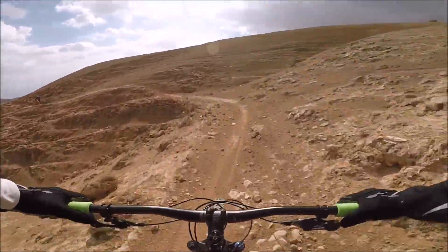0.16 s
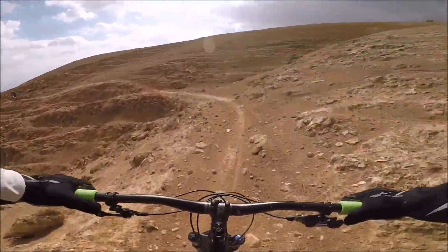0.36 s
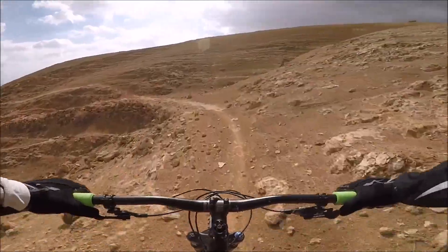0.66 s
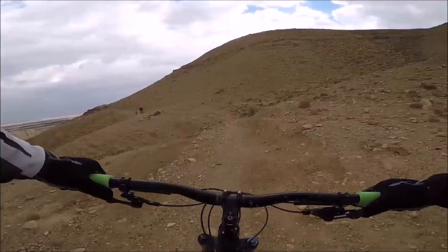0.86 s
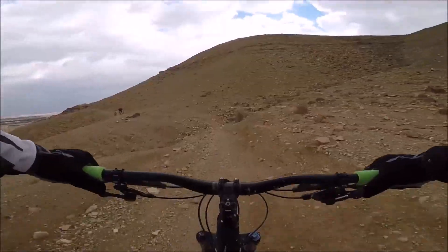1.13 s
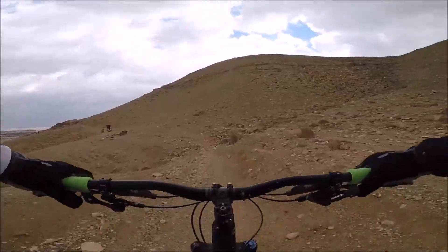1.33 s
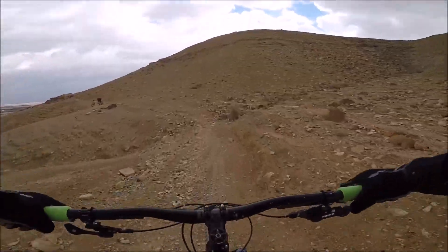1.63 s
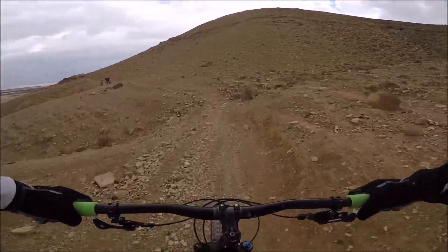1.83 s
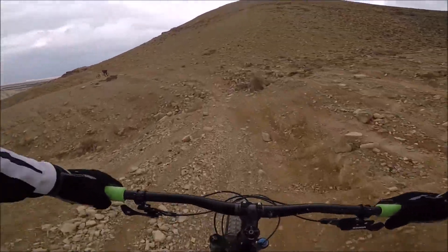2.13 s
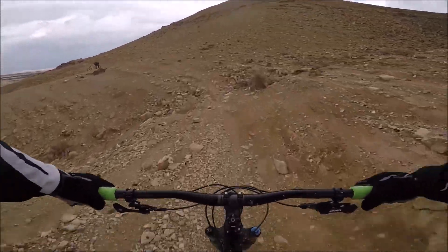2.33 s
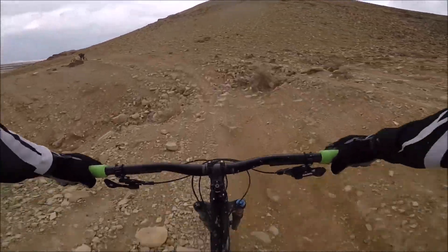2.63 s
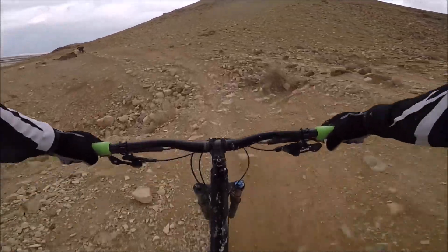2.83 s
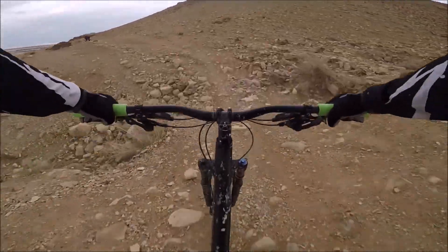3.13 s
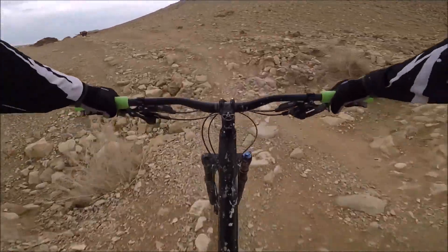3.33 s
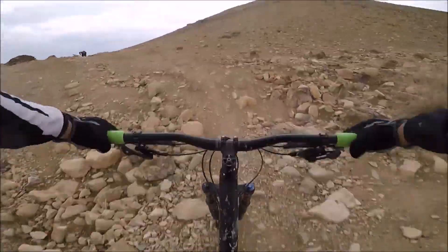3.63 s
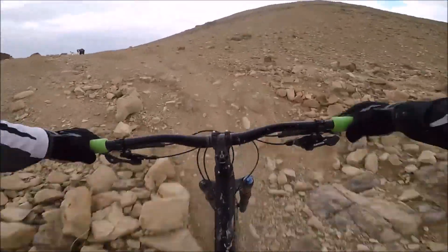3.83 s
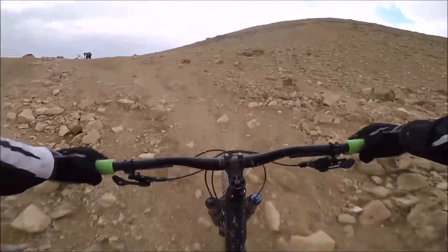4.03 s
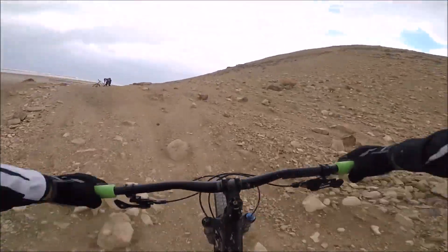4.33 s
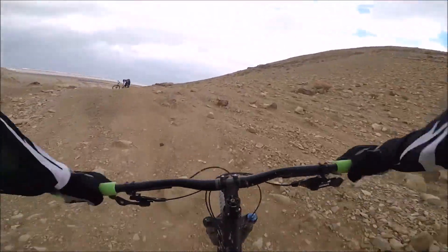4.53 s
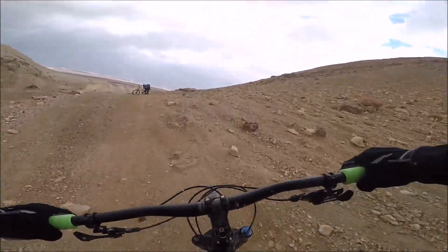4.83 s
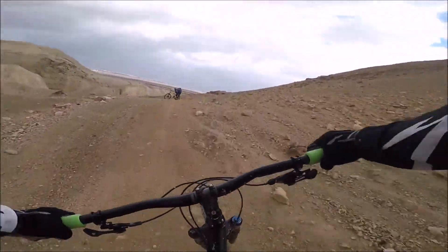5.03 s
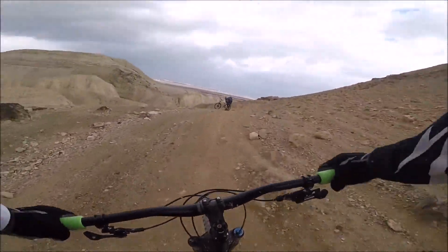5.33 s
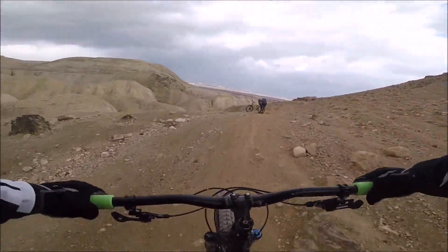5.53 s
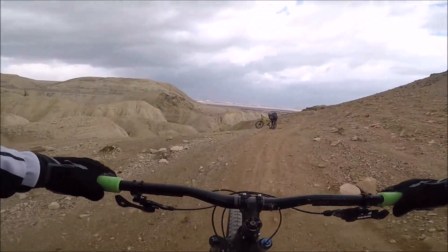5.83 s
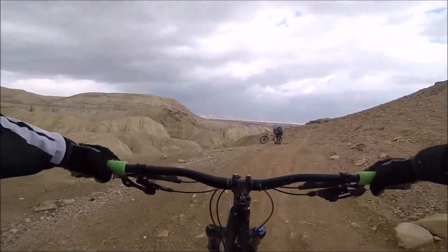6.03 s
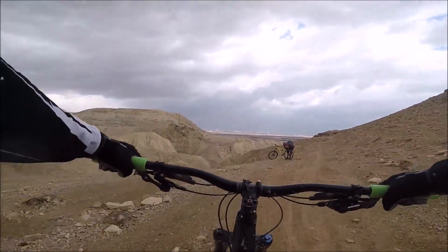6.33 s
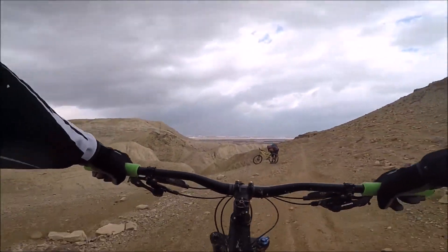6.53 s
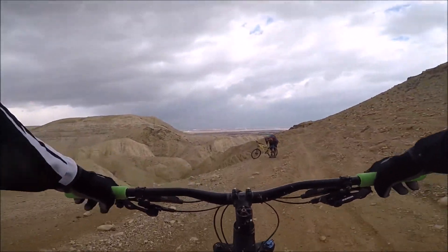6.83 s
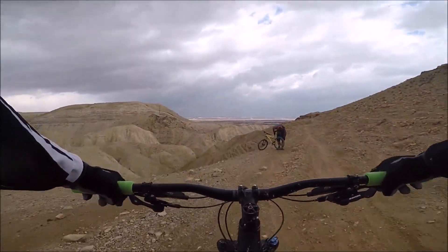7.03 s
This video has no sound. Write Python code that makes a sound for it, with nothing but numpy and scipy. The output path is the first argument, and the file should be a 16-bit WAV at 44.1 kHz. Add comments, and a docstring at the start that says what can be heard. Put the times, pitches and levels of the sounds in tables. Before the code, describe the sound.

Gritty tyre crunch and hollow frame knocks build over loose stones under rumbling wind, then ease into smooth coasting with distinct freewheel clicks.

```python
"""A rocky dirt trail, taken from a mountain bike by a small camera microphone on the rider's chest. Tyres
crunch grit and thud over rocks, with a hollow rub near 1.3 kHz swelling on the rough stretch: grains and noise
ring the frame's modes, as do knocking stones and cables. Scrapes are resonant noise. The freewheel purrs, then
ticks singly, its pawls driving small resonances. Coloured noise makes the wind at the microphone port; faint
treble noise comes and goes high up and flares with sharp jolts of the bike."""
import sys
import numpy as np
from scipy import signal
from scipy.fft import rfft, irfft, next_fast_len
from scipy.io import wavfile
from scipy.ndimage import uniform_filter1d, map_coordinates

SR = 44100
rng = np.random.default_rng(int(sys.argv[2]) if len(sys.argv) > 2 else 0)


def bounce(signal):
    """Save signal as a 16-bit WAV file at the path given by the first command-line argument."""
    frames = np.transpose(np.atleast_2d(signal))
    limited = np.clip(frames, -1, 1)
    pcm = np.round(limited * 32767).astype(np.int16)
    wavfile.write(sys.argv[1], SR, pcm)


N = 316135  # length in samples


def amp(db):
    """Decibels to linear gain."""
    return 10 ** (np.asarray(db) / 20)


def unit(x):
    """x scaled to an rms of 1."""
    return x / np.sqrt(np.mean(x ** 2) + 1e-20)


def curves(rows):
    """One value per sample for each column after the time, in straight lines between rows."""
    s, *columns = np.transpose(rows)
    return [np.interp(np.arange(N) / SR, s, column) for column in columns]


def wobble(rate):
    """A smooth random curve with rate knots a second."""
    knots = rng.standard_normal(int(N * rate / SR) + 4)
    return map_coordinates(knots, [np.arange(N) * rate / SR])


def filtered(x, response):
    """x passed through a complex response of frequency."""
    size = next_fast_len(x.shape[-1] + 8192)
    spectrum = rfft(x, size) * response(np.fft.rfftfreq(size, 1 / SR))
    return irfft(spectrum, size)[..., :x.shape[-1]]


def noise(spectrum, rate, lumpy_db):
    """Coloured noise of rms 1 whose level wanders in lumps."""
    f, db = np.transpose(spectrum)

    def colour(hz):
        return amp(np.interp(np.log(hz + 1), np.log(f + 1), db, left=-120, right=-120))

    lumps = amp(lumpy_db * wobble(rate))
    return unit(lumps * filtered(rng.standard_normal(N), colour))


def ringing(x, modes):
    """x drives a set of resonances side by side, alternating in sign."""
    def response(f):
        return sum((-1) ** k * amp(db) * 1j * f * width / (hz * hz - f * f + 1j * f * width)
                   for k, (hz, width, db) in enumerate(modes))

    return filtered(x, response)


def burst(pulses, t60):
    """Each pulse is a sharp push with a short puff of noise that falls 60 dB in t60 seconds."""
    t = np.arange(SR // 20) / SR
    puffs = signal.fftconvolve(pulses, amp(-60 * t / t60))[:N]
    return 6 * pulses + puffs * rng.standard_normal(N)


def grains(count, centre_hz, spread, cycles, spread_db):
    """Stones snap at random moments, each a damped sine of its own pitch and size.

    A positive spread_db lets a few stand out; a negative one makes a few faint."""
    at, size, phase = rng.random((count, 3)).T[:, :, None]
    hz = centre_hz * np.exp(spread * rng.standard_normal((count, 1)))
    k = np.arange(400)
    turns = hz * k / SR
    level = amp(-spread_db * np.log(1 - .99 * size))
    snaps = level * turns * np.exp(-3 * turns / cycles) * np.sin(2 * np.pi * (turns + phase))
    places = (at * N).astype(int) + k
    return unit(np.bincount(places.ravel(), snaps.ravel(), N + len(k))[:N])


def blows(events, bodies, rise, t60, push, size=N):
    """Each blow is a short rattle around one sharp push; it rings every body to its row's peak level."""
    out = np.zeros(size + SR // 12)
    t = np.arange(SR // 12) / SR
    for s, *parts_db in events:
        envelope = (1 - np.exp(-(t / rise) ** 2)) * amp(-60 * t / t60)
        rattle = envelope * rng.standard_normal(len(t))
        rattle[round(rise * SR)] += push
        start = round(s * SR)
        for gain, modes in zip(amp(parts_db), bodies):
            wider = [(hz, 2 * width, db) for hz, width, db in modes]
            part = ringing(ringing(rattle, modes), wider)
            out[start:start + len(t)] += gain * part / np.abs(part).max()
    return out[:size]


# Roughness of the ground under the tyres, before clumps: time_s, rub_db, crunch_db, grit_db
GROUND = [(0.0, -53, -58, -67), (0.96, -53.5, -56, -62.5), (1.24, -49, -53.5, -56),
          (1.64, -51.5, -52.5, -62), (2.14, -45, -48, -60), (2.85, -44, -50.5, -57.5),
          (3.17, -47, -56.5, -70), (3.39, -54, -49.5, -66), (3.71, -47, -48.5, -62),
          (3.89, -40, -47.5, -59.5), (4.03, -46, -49.5, -56.5), (4.31, -51, -52, -60.5),
          (4.81, -50.5, -52.5, -57.5), (5.09, -53, -53.5, -64.5), (5.39, -52, -54, -57),
          (5.61, -59.5, -57.5, -64.5), (6.59, -58, -59.5, -63), (7.17, -57, -61, -65)]
# The frame's low, middle and high sets of modes: pitch_hz, width_hz, gain_db
FRAME_MODES = [
    [(1078, 1010, 0.5), (1330, 276, 6.5), (1696, 275, -3)],
    [(2150, 670, -5), (2598, 136, 6.5), (2800, 810, -2), (3755, 750, -3)],
    [(3915, 250, 4.5), (5000, 380, -2.5), (5585, 330, 3.5), (7540, 5700, -7)],
]


def tyres():
    """Grit under the knobs shakes the frame's modes; rough ground comes in clumps."""
    clumps = 0.79 * wobble(7) + 1.15 * wobble(18)
    sand = amp(2.66 * wobble(150)) * rng.standard_normal((3, N))
    stones = grains(count=4000, centre_hz=1259, spread=0.45, cycles=2.5, spread_db=1.5)
    gravel = grains(count=5000, centre_hz=2810, spread=0.48, cycles=3.0, spread_db=5.5)
    grit = grains(count=6000, centre_hz=4600, spread=0.4, cycles=6.7, spread_db=-3.5)
    rub = unit(ringing(stones + 2.1 * sand[0], FRAME_MODES[0]))
    crunch = unit(ringing(gravel + .5 * stones + 2.44 * sand[1], FRAME_MODES[1]))
    fine = unit(ringing(grit + .5 * gravel + 1.17 * sand[2], FRAME_MODES[2]))
    rub_db, crunch_db, grit_db = curves(GROUND)
    return (amp(rub_db + 0.41 * clumps) * rub
            + amp(crunch_db + 1.5 * clumps) * crunch
            + amp(grit_db + 0.65 * clumps) * fine)


# A tyre rides over a rock: start_s, deep_thud_db, light_thud_db (peaks)
ROCKS = [(0.885, -34, -34), (0.981, -58, -34.5), (1.084, -59, -36), (1.322, -44, -30), (1.461, -35, -37),
         (1.523, -51, -35), (1.821, -26, -29), (1.962, -24, -43), (2.022, -29, -46), (2.382, -29, -32),
         (2.442, -26, -36), (3.145, -29, -37), (3.186, -24, -34), (3.216, -28, -42), (3.261, -31, -42),
         (3.298, -24, -31), (3.315, -25, -30), (3.349, -24, -33), (3.398, -24, -33), (3.428, -31, -34),
         (3.472, -29, -35), (3.544, -33, -38), (3.575, -29, -33), (3.683, -26, -28), (3.853, -21, -37),
         (3.888, -32, -38), (4.103, -27, -36), (4.44, -38, -40), (4.452, -50, -40), (4.467, -38, -41),
         (4.636, -29, -35), (4.655, -40, -44), (4.991, -37, -34), (5.327, -29, -36), (5.839, -30, -40),
         (5.935, -28, -44), (6.253, -28.5, -56), (6.345, -30, -46), (6.746, -26.5, -42)]
# The tyre's deep and light sets of modes: pitch_hz, width_hz, gain_db
TYRE_MODES = [
    [(257, 150, 0)],
    [(513, 760, 0), (844, 500, 4.5)],
]


def bumps():
    """Rocks strike the tyre and ring its deep and light modes."""
    return blows(ROCKS, TYRE_MODES, rise=0.002, t60=0.035, push=10)


# Stones and cables hit the frame: start_s, low_pitch_hz, low_db, middle_pitch_hz, middle_db, high_db (peaks)
FRAME_HITS = [(0.553, 1660, -57, 3350, -38, -45), (0.587, 1220, -42, 3260, -35, -33),
              (0.597, 1080, -48, 3220, -46, -39), (0.605, 1170, -46, 3000, -47, -35),
              (0.635, 865, -37, 3360, -43, -45), (0.654, 1090, -55, 3230, -46, -45),
              (0.675, 980, -57, 3170, -41, -40), (0.887, 1290, -36.5, 2780, -39, -41),
              (0.983, 1000, -41, 2300, -34, -47), (1.085, 1260, -40, 3260, -30, -51),
              (1.145, 1800, -25, 2280, -28, -30.5), (1.322, 1070, -35, 3220, -28.5, -35),
              (1.392, 1400, -36, 2390, -27.5, -28.5), (1.408, 1380, -35, 2500, -42, -51),
              (1.468, 1280, -55, 3600, -37, -46), (1.524, 1090, -39, 2400, -29, -34),
              (1.543, 1450, -44, 2630, -25.5, -38), (1.562, 1080, -32.5, 3460, -31, -40),
              (1.606, 1180, -52, 2740, -42, -44), (1.66, 1120, -38, 2260, -43, -49),
              (1.712, 1220, -34.5, 2800, -40, -54), (1.822, 1080, -24.5, 3150, -29.5, -42),
              (1.834, 1300, -45, 3000, -26.5, -42), (1.902, 1010, -32, 2410, -29, -38),
              (1.948, 1290, -31, 2370, -28, -52), (2.085, 1610, -56, 2450, -38, -57),
              (2.117, 1400, -22.5, 1830, -26, -51), (2.158, 1310, -39, 2660, -41, -53),
              (2.234, 1590, -56, 2150, -31, -63), (2.26, 1340, -26, 2440, -27, -42),
              (2.325, 1380, -44, 2610, -35, -58), (2.386, 1490, -27, 2520, -19.5, -54),
              (2.4, 1110, -41, 2450, -30, -52), (2.477, 1360, -35, 2240, -45, -52),
              (2.541, 1330, -31, 2360, -46, -51), (2.638, 1030, -36, 2880, -30, -49),
              (2.655, 1300, -24, 2050, -31, -49), (2.72, 1020, -41, 2540, -25.5, -46),
              (2.771, 1170, -28.5, 2580, -35, -36), (2.842, 1230, -30, 2400, -39, -49),
              (2.866, 1260, -17.5, 2100, -24.5, -59), (2.927, 1210, -25, 2350, -39, -41),
              (2.981, 1500, -27.5, 2680, -38, -47), (3.027, 1450, -44, 2950, -33, -58),
              (3.138, 1080, -32, 2520, -25.5, -57), (3.271, 1130, -37, 2900, -47, -70),
              (3.364, 1180, -35, 2660, -53, -56), (3.511, 1090, -33.5, 2700, -26, -47),
              (3.547, 1820, -29, 2060, -33.5, -57), (3.585, 1040, -41, 2230, -40, -52),
              (3.673, 1110, -36, 2730, -30, -53), (3.681, 1080, -27.5, 2280, -30, -44),
              (3.72, 1010, -33, 2300, -43, -57), (3.87, 1260, -37, 2190, -33, -39.5),
              (3.88, 1200, -47, 2220, -27.5, -44), (3.918, 1190, -25.5, 2510, -24.5, -47),
              (3.938, 1030, -49, 3400, -26, -38), (4.101, 1320, -29, 2960, -43, -34.5),
              (4.131, 1660, -45, 2400, -32, -31), (4.192, 1160, -43, 3290, -33, -49),
              (4.213, 1330, -31, 2340, -20, -27), (4.317, 1430, -33.5, 2350, -32, -65),
              (4.391, 1570, -50, 2730, -30.5, -43), (4.507, 1300, -34, 2280, -39, -57),
              (4.517, 1260, -33, 2440, -34, -45), (4.54, 1480, -31.5, 2520, -29, -31),
              (4.622, 1190, -41, 2730, -37, -48), (4.638, 1060, -48, 2640, -26.5, -37),
              (4.771, 1340, -32.5, 2500, -45, -54), (4.782, 1330, -31, 2330, -29.5, -51),
              (4.819, 1360, -39, 2850, -35, -57), (4.84, 1210, -36, 2740, -32.5, -55),
              (4.853, 1220, -34, 2760, -42, -53), (4.892, 1150, -40, 2850, -35, -52),
              (4.967, 1320, -37.5, 3290, -30.5, -46), (4.991, 1800, -34, 2380, -31, -34),
              (5.078, 1420, -29, 2100, -34, -53), (5.124, 930, -63, 2740, -38, -55),
              (5.285, 1250, -41, 2950, -37, -48), (5.439, 1160, -45, 3420, -34, -34.5),
              (5.478, 1120, -42, 2930, -36, -46), (5.534, 1360, -54, 3190, -39, -51),
              (5.553, 1240, -25.5, 2600, -26.5, -55), (5.828, 1300, -55, 3340, -33, -55),
              (5.916, 1360, -47, 3330, -30.5, -51), (6.422, 1120, -39, 2390, -64, -59),
              (6.928, 1270, -42, 2950, -47, -50)]
SPOT_WIDTH = .42  # width over pitch of the band that a struck spot favours


def near_spot(modes, spot_hz):
    """Modes far from the struck spot's pitch are weakened, and the spot adds a broad one of its own."""
    favoured = [(hz, width, db - 20 * np.log10(1 + (np.log(hz / spot_hz) / SPOT_WIDTH) ** 2))
                for hz, width, db in modes]
    return favoured + [(spot_hz, SPOT_WIDTH * spot_hz, 6)]


def knocks(events, rise, t60, push):
    """Each knock rings the frame's modes, low and middle ones most near the spot's pitches."""
    out = np.zeros(N)
    for s, low_hz, low_db, middle_hz, middle_db, high_db in events:
        highs = [(hz, width, db + rng.normal(0, 1.5)) for hz, width, db in FRAME_MODES[2]]
        bodies = [near_spot(FRAME_MODES[0], low_hz), near_spot(FRAME_MODES[1], middle_hz), highs]
        row = (0.0006, low_db, middle_db, high_db)
        blow = blows([row], bodies, rise, t60, push, size=SR // 12)
        start = round(s * SR)
        out[start:start + len(blow)] += blow[:N - start]
    return out


RATTLES_PER_S, RATTLE_OVER_DB, RATTLE_SCATTER_DB = 30, 2, 2  # rate, least peak over ground level, spread


def rattles():
    """Small stones flick the frame at random in close pairs, harder where the ground is rough."""
    draws = rng.random((round(RATTLES_PER_S * N / SR), 7))
    pair = np.arange(len(draws)) // 2 * 2  # both of a pair share one moment
    at = np.clip(draws[pair, 0] * N / SR + .04 * draws[:, 1], 0, (N - 1) / SR)
    ground_db = np.transpose(curves(GROUND))[(at * SR).astype(int)]
    scatter_db = -RATTLE_SCATTER_DB * np.log(1 - .95 * draws[:, 2:5])
    low_db, middle_db, high_db = (ground_db + RATTLE_OVER_DB + scatter_db).T
    low_hz = 1000 * np.exp(0.75 * draws[:, 5])
    middle_hz = 2100 * np.exp(.5 * draws[:, 6])
    rows = np.column_stack([at, low_hz, low_db, middle_hz, middle_db, high_db])
    return knocks(rows, rise=0.0028, t60=0.057, push=3.3)


# Short scrapes, rubs and scuffs: start_s, length_s, centre_hz, width_hz, level_db
SCRAPE_EVENTS = [(0.175, 0.084, 2850, 3400, -48), (0.536, 0.23, 3460, 900, -52.5),
                 (1.89, 0.073, 1140, 403, -39), (2.031, 0.051, 1320, 300, -45),
                 (2.247, 0.027, 1350, 300, -42), (2.308, 0.069, 1340, 299, -44),
                 (2.41, 0.077, 1310, 300, -50), (2.583, 0.03, 2980, 1200, -45),
                 (2.925, 0.11, 1550, 550, -41), (2.954, 0.051, 3030, 1490, -45.5),
                 (3.159, 0.039, 2960, 1500, -45), (3.665, 0.043, 1590, 1510, -44),
                 (3.812, 0.057, 900, 497, -42), (3.931, 0.02, 3980, 4000, -38),
                 (4.214, 0.04, 2760, 3000, -49), (4.011, 0.037, 1420, 1510, -40),
                 (4.42, 0.073, 620, 450, -43), (4.508, 0.048, 1800, 1800, -42),
                 (4.618, 0.066, 1070, 900, -43), (4.759, 0.035, 1900, 1790, -42.5),
                 (4.821, 0.037, 1800, 2000, -47), (5.4, 0.049, 2770, 2000, -50),
                 (5.466, 0.03, 2810, 1200, -44.5), (5.783, 0.072, 3130, 2000, -58),
                 (6.353, 0.024, 4460, 3000, -51.5), (6.731, 0.034, 2500, 2010, -50)]


def scrapes():
    """Each scrape is fluttering noise through one steep resonance."""
    t = np.arange(N) / SR
    rasp = amp(2.5 * wobble(120)) * rng.standard_normal(N)
    out = np.zeros(N)
    for s, length, hz, width_hz, db in SCRAPE_EVENTS:
        mode = [(hz, width_hz, 0)]
        swell = np.abs(np.sin(np.pi * np.clip((t - s) / length, 0, 1))) ** .5
        out += amp(db) * swell * unit(ringing(ringing(rasp, mode), mode))
    return out


# The even purr of the freewheel: time_s, ticks_per_s, click_db, ring_db
PURR = [(0, 42.5, -67, -63), (.5, 44, -62.5, -62), (.88, 43, -62.5, -60.5), (1.05, 51, -64.5, -59),
        (1.5, 58, -66, -58), (2.4, 61, -65, -60), (3.3, 59, -67, -63), (4.1, 49, -67, -64),
        (5.05, 45, -66, -64), (5.6, 32, -68, -66)]
# Single pawl clicks on the smooth stretch: start_s, ring_db, click_db (peaks)
SINGLE_TICKS = [(5.611, -56, -58), (5.642, -56, -52), (5.676, -51, -48), (5.713, -53, -57),
                (5.751, -53, -51), (5.798, -46, -48), (5.848, -55, -57), (5.895, -50, -58),
                (5.939, -48, -50), (5.967, -50, -50), (6.045, -53, -57), (6.088, -44.5, -67),
                (6.119, -54, -56), (6.145, -52, -55), (6.169, -47, -48), (6.19, -56, -51),
                (6.214, -54, -50), (6.238, -54, -50), (6.265, -52, -52), (6.292, -53, -52),
                (6.32, -49, -55), (6.345, -43, -55), (6.363, -48, -52), (6.396, -49, -50),
                (6.426, -55, -53), (6.444, -49, -51), (6.476, -51, -50), (6.519, -49, -64),
                (6.551, -53, -58), (6.578, -51, -57), (6.607, -47, -50), (6.64, -58, -56),
                (6.667, -56, -51), (6.693, -44, -55), (6.717, -43, -55), (6.744, -48, -59),
                (6.769, -54, -53), (6.802, -55, -53), (6.834, -42, -47), (6.871, -46, -60),
                (6.903, -47, -57), (6.929, -53, -55), (6.949, -51, -58), (6.989, -46, -49),
                (7.026, -46, -51), (7.048, -55, -58), (7.066, -47, -53), (7.109, -50, -54),
                (7.145, -44, -53)]
# The pawl's ring and click sets of modes: pitch_hz, width_hz, gain_db
PAWL_MODES = [
    [(2920, 100, 5), (3790, 170, 0)],
    [(4620, 380, 4), (5470, 140, -1.5)],
]
FIRST_TOOTH = .8  # share of the way to the next tooth at the start


def freewheel():
    """Pawls click over the ratchet teeth: an even purr at speed, then single ticks as the bike slows."""
    rate, click_db, ring_db = curves(PURR)
    purring = np.arange(N) < PURR[-1][0] * SR
    teeth_passed = np.floor(FIRST_TOOTH + np.cumsum(rate) / SR)
    teeth = purring * np.diff(teeth_passed, prepend=0)
    click_push = burst(teeth * amp(1.2 * wobble(20)), .02)
    click = unit(ringing(ringing(click_push, PAWL_MODES[1]), [(4800, 2000, 0)]))
    ring_push = burst(teeth * amp(2.5 * wobble(12)), .035)
    ring = unit(ringing(ringing(ring_push, PAWL_MODES[0]), [(2950, 500, 0)]))
    ticks = blows(SINGLE_TICKS, PAWL_MODES, rise=0.0008, t60=0.026, push=1.4)
    return amp(click_db) * click + amp(ring_db) * ring + ticks


# Gusts over the microphone port, before eddies: time_s, buffet_db, roar_db
GUSTS = [(0.0, -31.5, -48), (0.12, -40, -37), (0.16, -30.5, -35), (0.3, -46.5, -51), (0.42, -29.5, -37.5),
         (0.46, -36, -36), (0.6, -31, -41), (0.66, -48, -48), (0.76, -36, -48), (0.86, -30.5, -39),
         (0.98, -33, -48), (1.04, -43.5, -48.5), (1.22, -46.5, -49), (1.44, -54, -52), (1.58, -31.5, -40.5),
         (1.62, -32.5, -39.5), (1.67, -39, -44), (1.69, -30.5, -36), (2.06, -32.5, -37),
         (2.25, -35.5, -43.5), (2.27, -31.5, -38), (2.31, -42, -41.5), (2.45, -31, -34.5),
         (2.55, -33, -37.5), (2.97, -31, -36.5), (3.11, -37.5, -37), (3.15, -34.5, -34), (3.39, -31.5, -36),
         (3.71, -32.5, -37), (3.81, -25.5, -34.5), (3.93, -33, -32), (4.07, -36.5, -42), (4.11, -34.5, -37),
         (4.41, -40, -49), (4.45, -40, -38.5), (4.49, -40.5, -44.5), (4.75, -40, -46), (4.81, -34, -45.5),
         (4.87, -64, -48), (5.01, -46, -51), (5.13, -53.5, -53.5), (5.21, -38, -45.5), (6.21, -46, -45.5),
         (6.37, -39.5, -44.5), (6.69, -47.5, -44), (6.77, -42.5, -47), (7.17, -42.5, -46)]
# Level of the lowest bass: time_s, level_db
THROB_LEVEL = [(0, -38.5), (.86, -43.5), (1.3, -43), (1.9, -38), (3.0, -42.5), (4.05, -36), (4.5, -40),
               (4.8, -34), (5.1, -42.5), (5.45, -34), (6.0, -41.5), (7.17, -41.5)]
# Relative colours of throb, buffet and roar: pitch_hz, level_db (per Hz)
THROB_COLOUR = [(10, -48), (22, -2.5), (50, -8.5), (75, -14), (120, -79)]
BUFFET_COLOUR = [(30, -26), (60, -2.5), (105, 1.5), (160, -5.5), (300, -29.5)]
ROAR_COLOUR = [(90, -29), (170, -2), (260, 1), (400, -7), (650, -11), (1000, -21.5), (2000, -53)]


def wind():
    """Eddies over the port: slow throbs, a buffet near 100 Hz and a roar above."""
    buffet_db, roar_db = curves(GUSTS)
    throb_db, = curves(THROB_LEVEL)
    eddies = wobble(25)
    return (amp(throb_db) * noise(THROB_COLOUR, 12, lumpy_db=2.5)
            + amp(buffet_db + 0.3 * eddies) * noise(BUFFET_COLOUR, 16, lumpy_db=0.7)
            + amp(roar_db + 0.09 * eddies) * noise(ROAR_COLOUR, 40, lumpy_db=2.0))


# Level of the faint treble hiss, before jolts: time_s, level_db
HISS_LEVEL = [(0.02, -84), (.5, -72.5), (1.6, -68.5), (2.95, -73), (3.1, -88), (3.6, -100), (4.2, -90),
              (4.45, -76), (4.7, -71.5), (6.0, -72), (7.17, -73.5)]
# Spells of the topmost hiss, before jolts: start_s, end_s, level_db
HISS_SPELLS = [(0.875, 1.23, -82), (1.34, 2.08, -75.5), (5.5, 7.3, -81.5)]
# Relative colours of the hiss and the topmost hiss: pitch_hz, level_db (per Hz)
HISS_COLOUR = [(5000, -41), (7000, -7), (8500, 0.5), (10300, -4), (11300, -12), (12000, -54)]
TOP_HISS_COLOUR = [(11000, -59), (12000, 8), (13200, -1), (15000, 5)]
SPELL_EDGE_S = 0.028  # fade in and out of a spell


def treble_hiss(bike):
    """Faint noise high up comes and goes, flaring with every sharp jolt of the bike."""
    hiss_db, = curves(HISS_LEVEL)
    t = np.arange(N) / SR
    spells = np.zeros(N)
    for start, end, db in HISS_SPELLS:
        spells += amp(db) * np.clip(np.minimum(t - start, end - t) / SPELL_EDGE_S, 0, 1)
    bends = np.diff(bike, n=2, prepend=[0, 0])  # second difference favours the treble
    sharp = np.sqrt(np.abs(uniform_filter1d(bends ** 2, size=300)))
    jolts = sharp / uniform_filter1d(sharp, size=SR // 3)  # against the passing average
    return (amp(hiss_db) * jolts ** 0.63 * noise(HISS_COLOUR, 22, lumpy_db=1.0)
            + spells * jolts ** 0.9 * noise(TOP_HISS_COLOUR, 12, lumpy_db=3.0))


def housing(hz):
    """The path through the housing, which dulls the treble and thins the bass."""
    return 1 / (1 + (hz / 6800) ** 14) * hz ** 2 / (hz ** 2 + 150 ** 2)


def mount(hz):
    """The path up the mount, brighter than the housing."""
    return 1 / (1 + (hz / 7600) ** 12)


def scene():
    """The bike comes through the housing, hard knocks up the mount; wind and hiss join directly."""
    hard = knocks(FRAME_HITS, rise=0.0016, t60=0.037, push=11)
    rolling = tyres() + rattles() + bumps() + scrapes() + freewheel()
    bike = filtered(rolling, housing) + filtered(hard, mount)
    return (bike + wind() + treble_hiss(rolling + hard))[None]


TOP_HZ = 15300  # the camera's band limit


def record(dry):
    """Peaks are rounded off softly, and the camera keeps nothing above its band limit."""
    rounded = dry / (1 + np.abs(dry / .14) ** 4) ** (1 / 4)
    return filtered(rounded, lambda hz: hz < TOP_HZ)


dry = scene()
out = record(dry)
bounce(out)
```